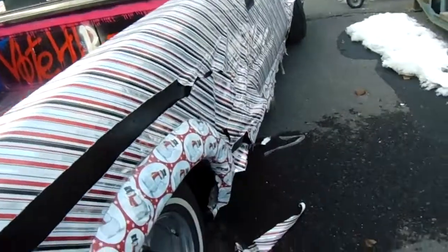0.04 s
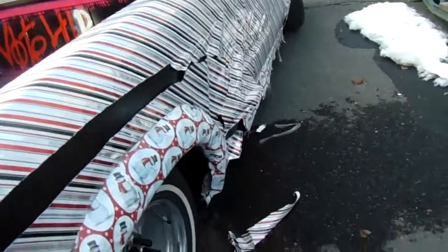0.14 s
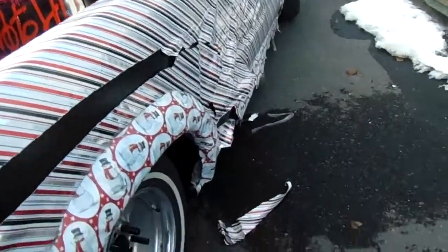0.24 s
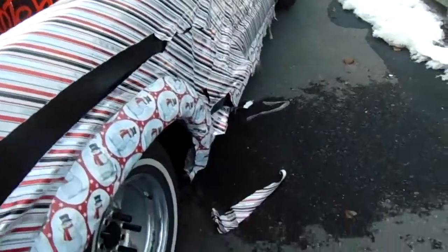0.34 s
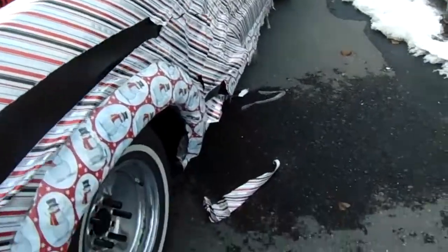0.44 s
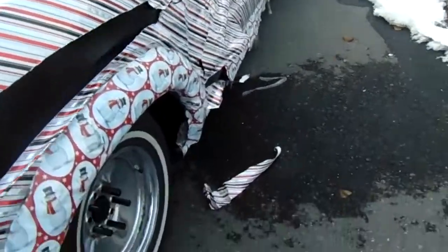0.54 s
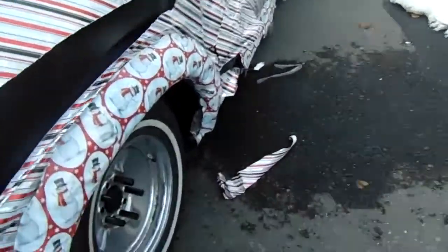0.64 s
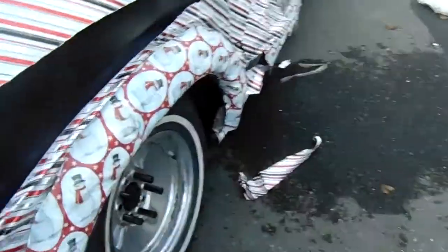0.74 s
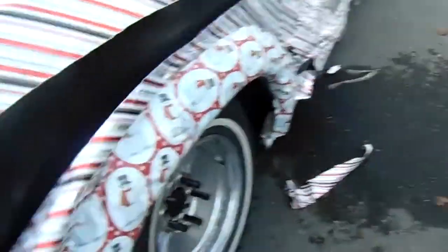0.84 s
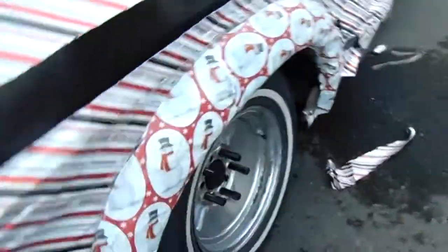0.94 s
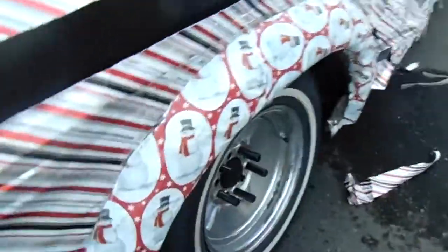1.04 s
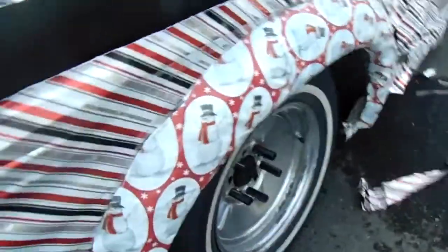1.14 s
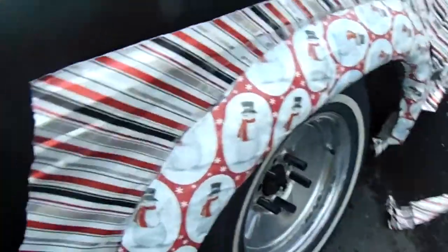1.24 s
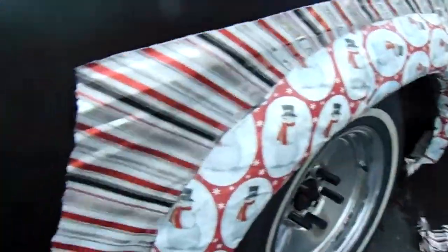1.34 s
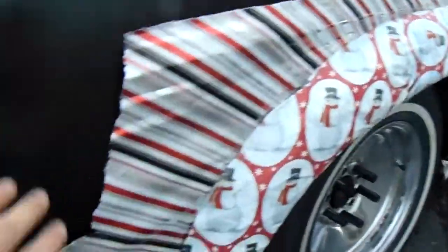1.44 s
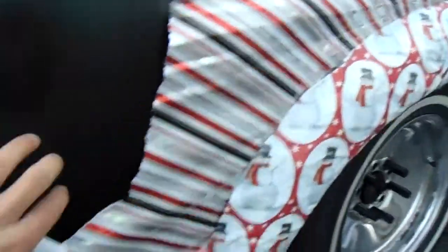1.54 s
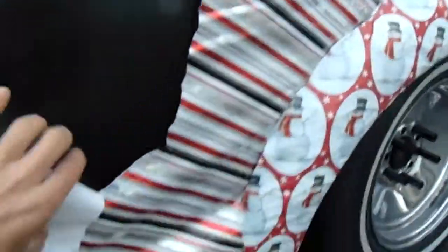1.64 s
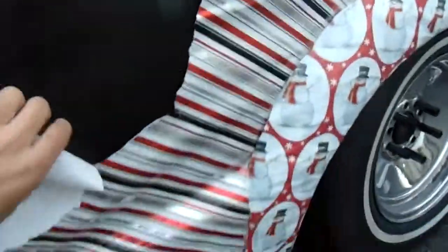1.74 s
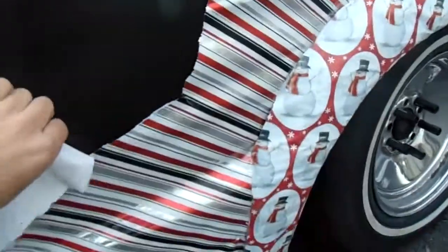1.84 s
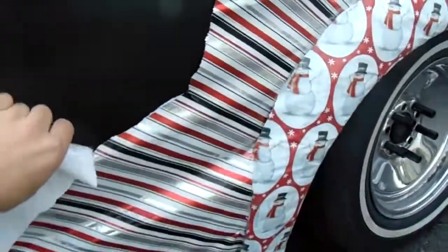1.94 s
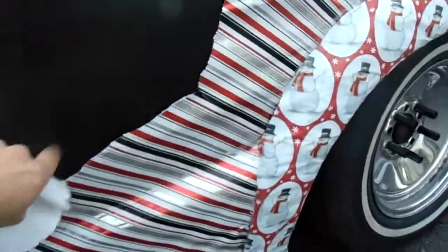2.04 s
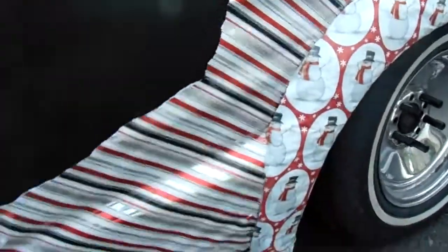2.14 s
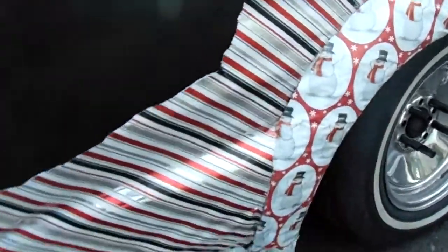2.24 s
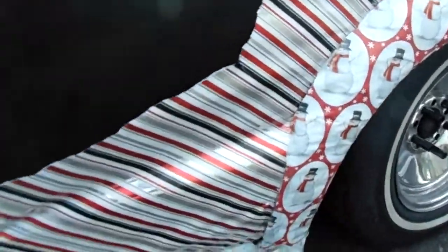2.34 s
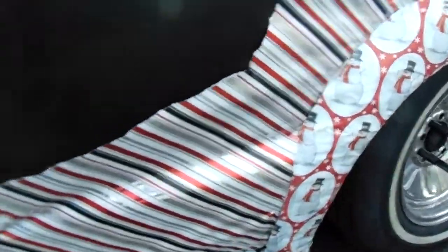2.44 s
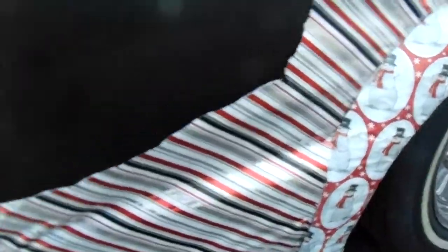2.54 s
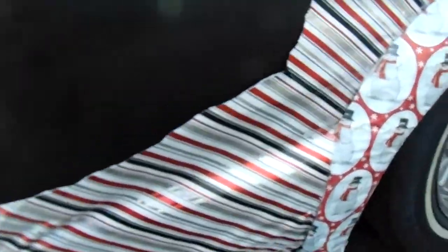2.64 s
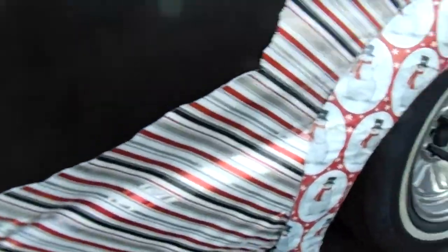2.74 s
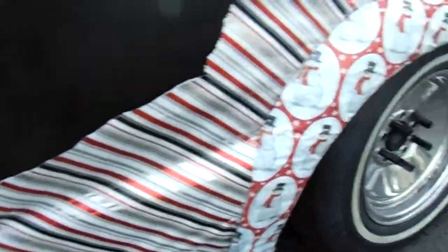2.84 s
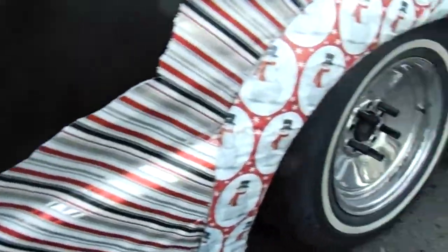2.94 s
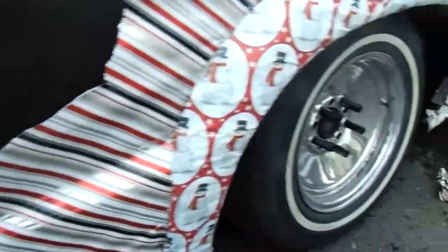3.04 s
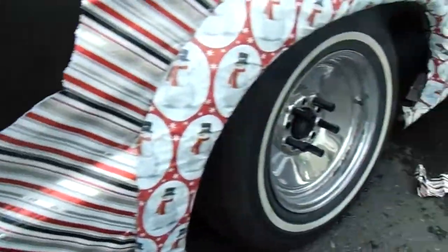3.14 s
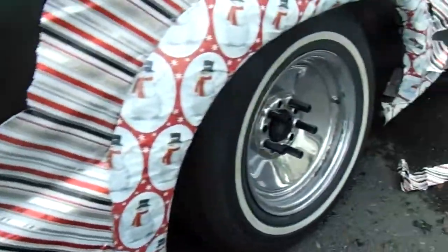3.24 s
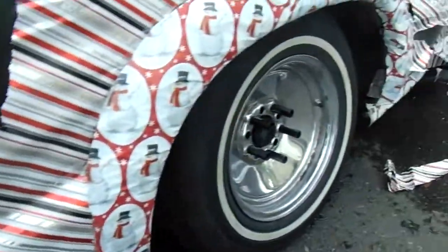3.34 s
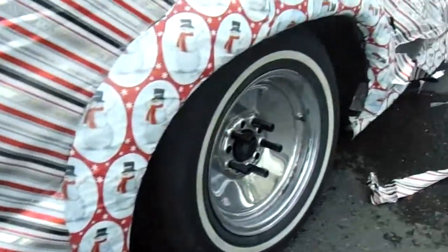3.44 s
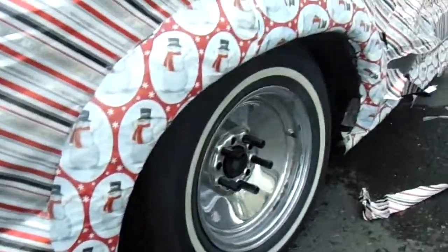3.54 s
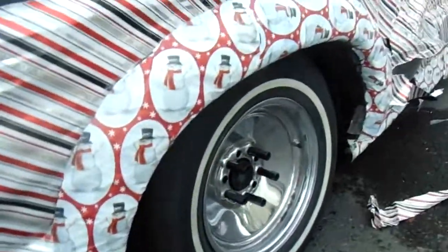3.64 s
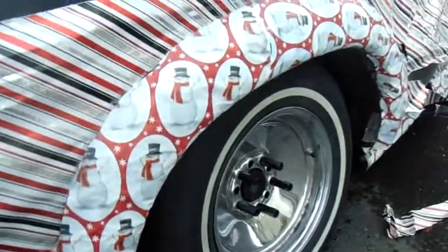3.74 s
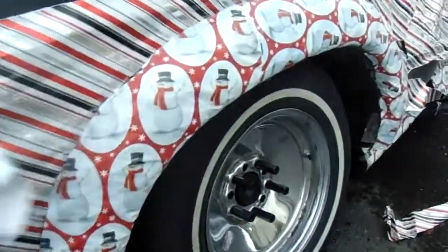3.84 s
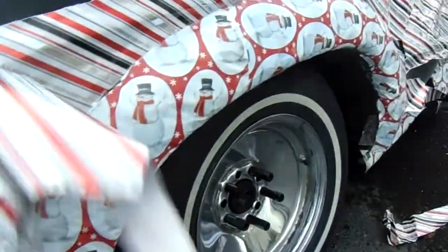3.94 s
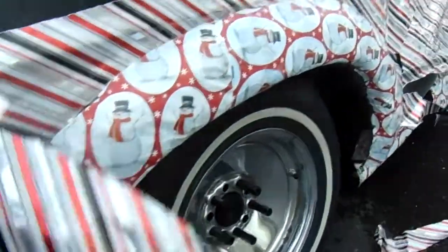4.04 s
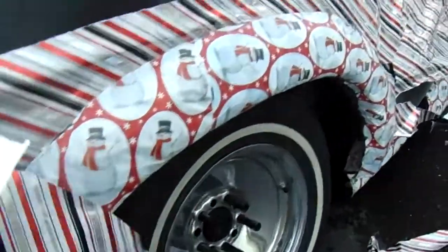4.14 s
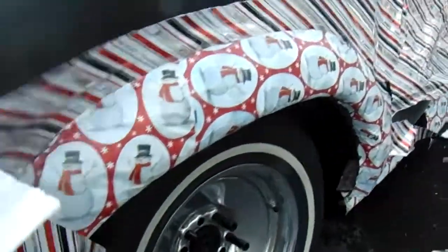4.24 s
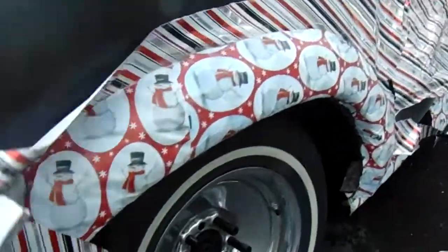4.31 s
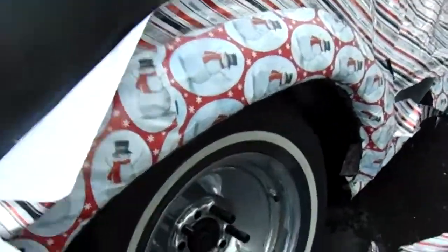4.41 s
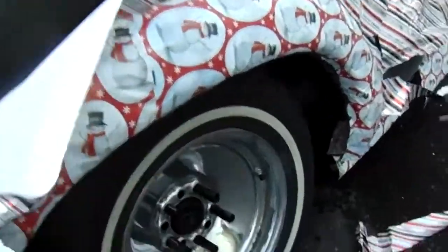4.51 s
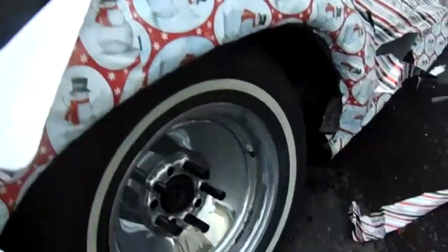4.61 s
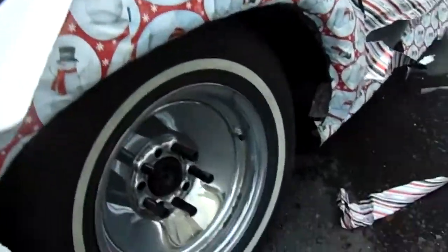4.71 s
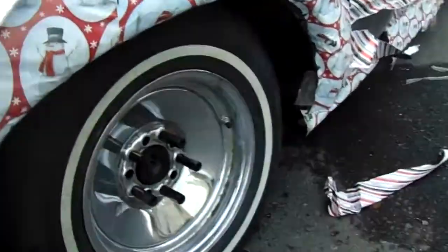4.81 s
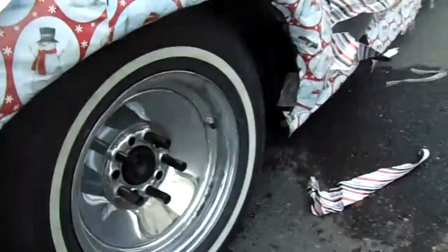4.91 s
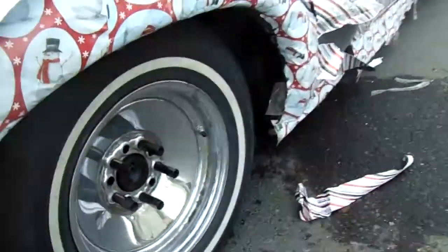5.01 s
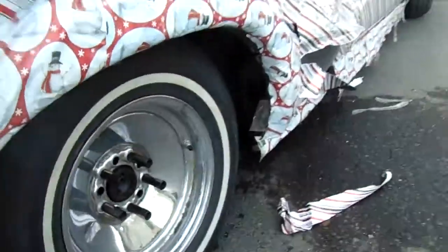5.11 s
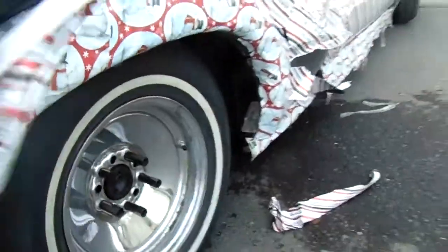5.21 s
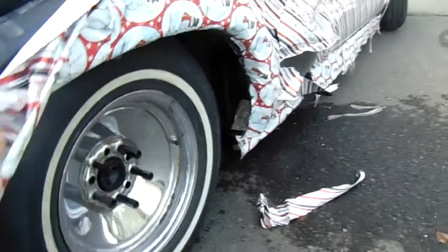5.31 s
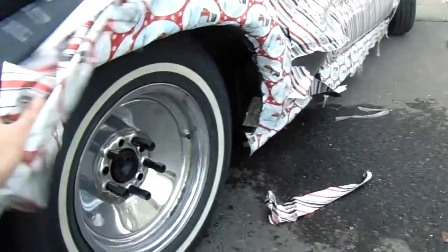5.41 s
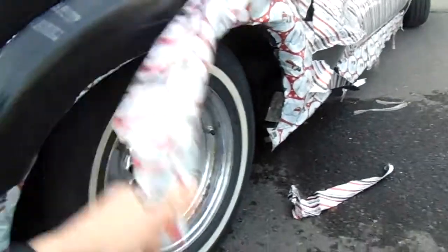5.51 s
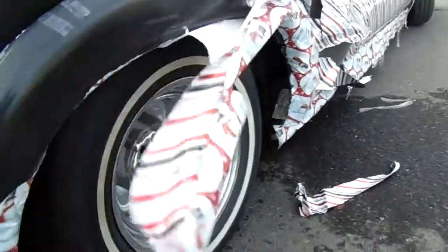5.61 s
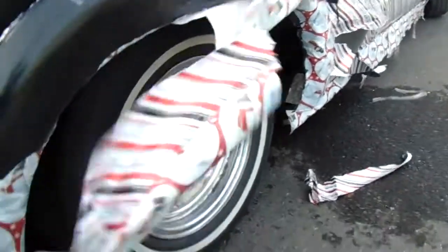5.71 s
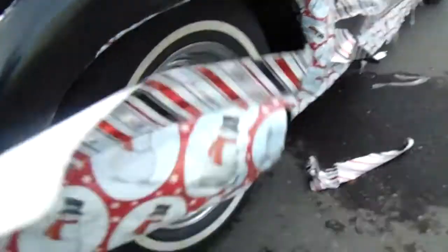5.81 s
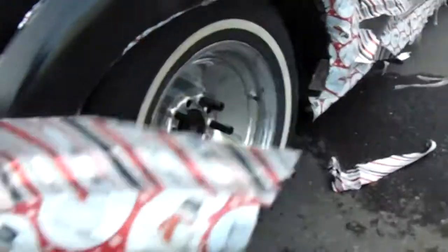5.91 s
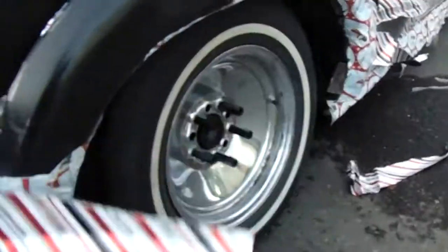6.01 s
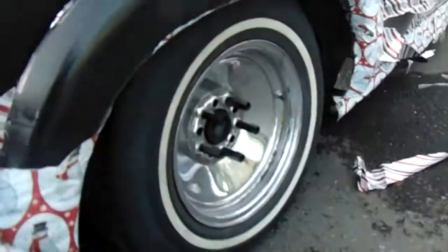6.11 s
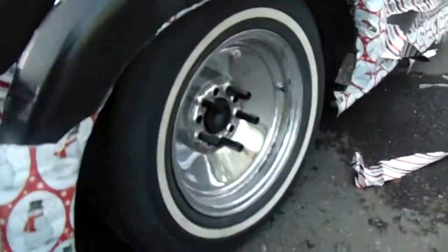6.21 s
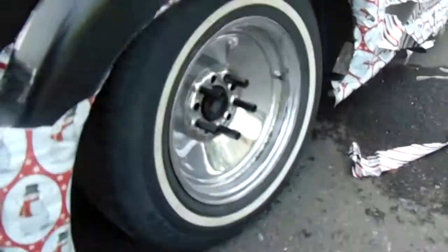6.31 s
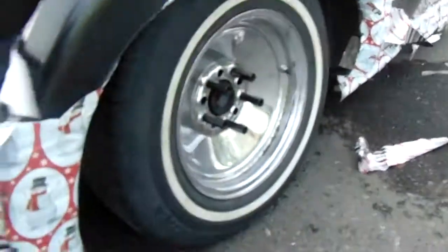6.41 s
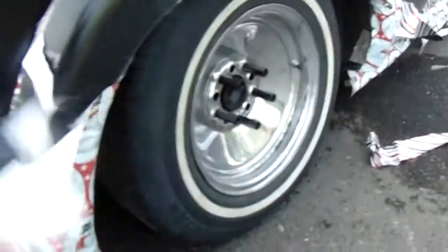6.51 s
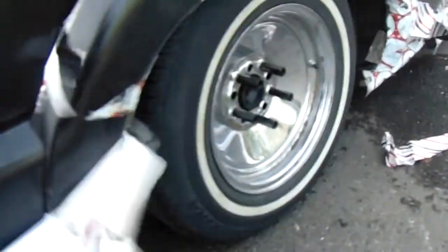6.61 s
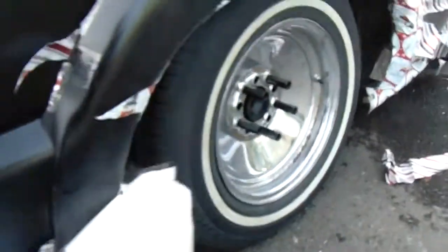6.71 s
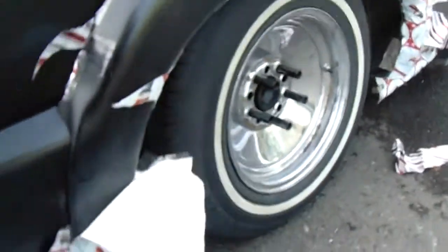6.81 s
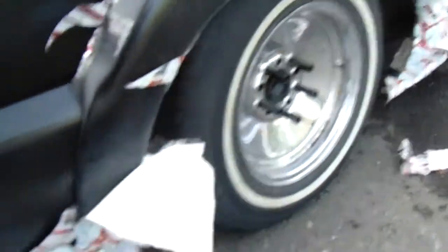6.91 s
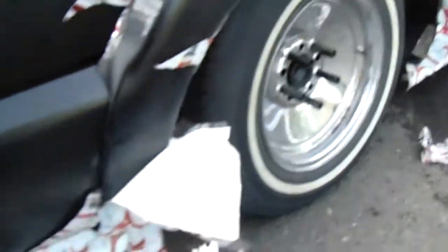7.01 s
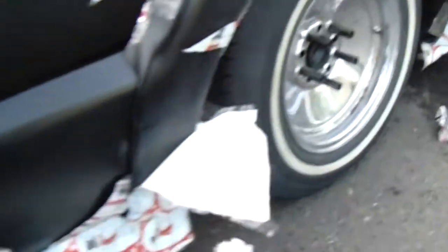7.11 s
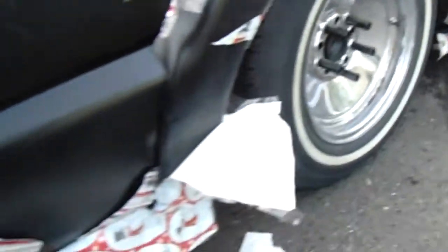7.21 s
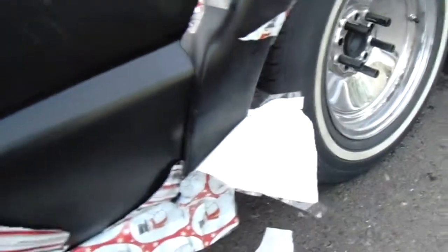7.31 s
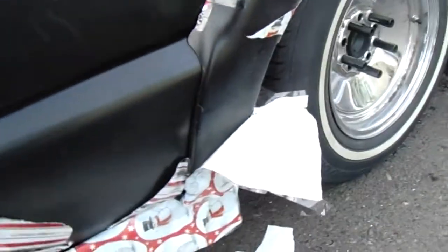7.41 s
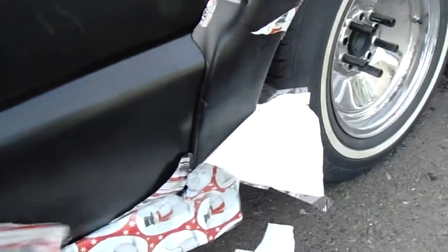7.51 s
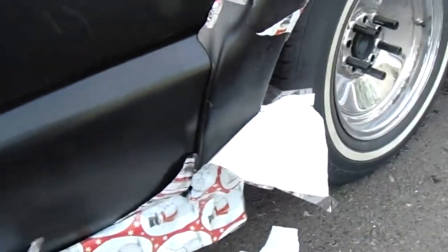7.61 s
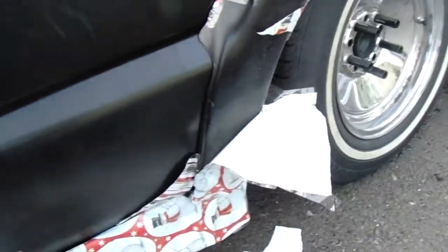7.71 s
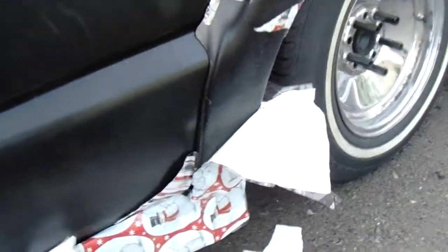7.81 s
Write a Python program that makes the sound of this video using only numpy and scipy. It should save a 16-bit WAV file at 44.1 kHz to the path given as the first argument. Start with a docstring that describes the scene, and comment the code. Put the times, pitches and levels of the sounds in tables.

```python
"""Wrapping paper is torn and crumpled off a car body outdoors, in rushes with short pauses.
Breaking fibres crackle as clumped noise bursts, creases snap as clicks, the loose sheet drags as resonant noise.
Knocks and the tearing paper ring the low modes of the wing panel.
The street and the handled car body rumble as low noise bands, a far engine drones as a wavering sine;
the microphone hisses and whines."""
import sys
import numpy as np
from scipy import signal
from scipy.io import wavfile
from scipy.ndimage import uniform_filter1d

SR = 44100
rng = np.random.default_rng(int(sys.argv[2]) if len(sys.argv) > 2 else 0)


def transcribe(u):
    """Save the signal u as a 16-bit wav file named by the first command-line argument.

    u: samples, shape (n,) or (channels, n), limited to [-1, 1]; the rate is SR.
    q: integer samples, one column per channel.
    """
    v = np.clip(np.atleast_2d(u).T, -1, 1)
    q = np.round(v * 32767).astype(np.int16)
    wavfile.write(sys.argv[1], SR, q)


N = 346211


def from_db(db):
    """Decibels to gain."""
    return 10 ** (np.asarray(db) / 20)


def rms_one(x):
    """Scale to rms 1."""
    return x / np.sqrt(np.mean(x ** 2) + 1e-20)


def in_time(rows):
    """Columns of a curve table at every sample."""
    s, *columns = np.transpose(rows)
    return [np.interp(np.arange(N) / SR, np.sort(s), c) for c in columns]


def at_hz(points, hz):
    """A spectrum read on a log-frequency axis."""
    curve_hz, curve_db = np.array(points).T
    return np.interp(np.log(hz), np.log(curve_hz), curve_db)


def drift(rate_hz):
    """Slow chance: noise twice through a one-pole low-pass, spread 1."""
    step = 20      # drawn once per 20 samples
    r = np.exp(-2 * np.pi * rate_hz * step / SR)
    noise = rng.standard_normal(N // step + 2002)
    slow = signal.lfilter([1], [1, -2 * r, r * r], noise)[2000:]      # skip the settling
    return np.interp(np.arange(N) / step, np.arange(len(slow)), rms_one(slow))


def band(x, low_hz, high_hz):
    """Band-pass."""
    sos = signal.butter(2, [low_hz, min(high_hz, SR * .45)], "band", fs=SR, output="sos")
    return signal.sosfilt(sos, x)


def dying(clicks, t60):
    """Each click starts an exponential fall of 60 dB in t60 seconds."""
    return signal.lfilter([1], [1, -from_db(-60 / (t60 * SR))], clicks + 1e-18)


def hands():
    """Level and colour of the crackle: tugs over the rustle, the loudest setting the colour."""
    # tugs on the sheet: (start [s], length [s], start level [dB], end level [dB],
    # treble lift [dB], low-mid lift [dB])
    tugs = [(.2,0.033,-40.5,-47.5,-6,11),(0.36,0.14,-48.5,-25,3.5,-8),(0.601,0.016,-29.5,-23,2,0.5),(0.687,.10,-44.5,-29.5,7,1.5),(0.849,0.048,-38.5,-33.5,1.5,-4),
            (0.9,0.12,-13,-39.5,-1.5,-3.5),(1.008,0.12,-32,-39,18,0),(1.232,0.033,-37.5,-36.5,-1,1.5),(1.262,0.12,-29,-39,-3,0.5),
            (1.631,0.098,-28.5,-49,-11.5,-0.5),(1.86,.2,-28,-28.5,0,-4.5),(2.072,0.11,-23.5,-22.5,1,-9.5),(2.2,0.18,-21.5,-26.5,6.5,-2.5),
            (2.487,0.037,-16,-32,9.5,-3.5),(2.539,0.13,-22.5,-31,4.5,-6.5),
            (3.306,.07,-39,-37,1,-2),(3.48,0.064,-33,-30,9,-3),(3.667,0.27,-44,-37,-8,-6.5),(4.073,0.25,-36.5,-53.5,-3.5,5),
            (4.356,0.042,-30,-34.5,1.5,1),(4.616,0.072,-32.5,-46.5,10,0),
            (4.722,0.057,-49,-37.5,1,1),(4.831,0.17,-33.5,-36.5,-5,-5.5),(5.05,0.088,-26,-22.5,-2.5,-4),
            (5.158,0.067,-21,-15.5,-1.5,-4.5),(5.243,0.13,-28.5,-23.5,2,-3.5),
            (5.535,0.19,-19.5,-31.5,5,-3.5),(5.796,0.051,-31,-36.5,10,3),
            (6.346,0.075,-27,-30,3,-0.5),(6.436,0.044,-22,-21,4.5,-7.5),(6.474,0.16,-28.5,-33,6.5,0.5),(6.608,0.048,-20.5,-23.5,8,-3),(6.643,0.0091,-14.5,-16.5,-2.5,-1),
            (6.667,0.13,-34.5,-25,2.5,0),(6.805,0.16,-31,-51,0.5,0),
            (7.549,0.038,-29,-48,5.5,-3),(7.604,0.13,-37.5,-26,2.5,-1.5),(7.756,0.081,-28,-20.5,1,3)]
    # the loose sheet rustles between tugs: (time [s], level [dB])
    rustle = [(0,-56),(.13,-62.5),(.15,-48.5),(.55,-40.5),(.83,-34),(1.17,-48),(1.59,-48.5),(1.8,-42),(2.43,-38.5),(2.72,-51.5),
              (3.08,-61),(3.12,-46.5),(4.45,-44),(4.85,-40),(5.44,-46.5),(5.88,-46.5),(6.2,-51.5),(6.3,-42.5),
              (7.0,-55.5),(7.12,-61.5),(7.2,-69),(7.45,-59),(7.6,-43)]
    rustle_crisp_db, rustle_flap_db = -1.5, 4.5      # its treble and low-mid lift
    rise_db_per_s, fall_db_per_s = 1300, 1201      # how fast a tug takes hold and lets go

    t = np.arange(N) / SR
    power = from_db(2 * in_time(rustle)[0])
    crisp, flap = rustle_crisp_db * power, rustle_flap_db * power
    for s, length, start_db, end_db, crisp_db, flap_db in tugs:
        near = slice(round((s - .1) * SR), round((s + length + .2) * SR))
        since_start = t[near] - s
        db = np.interp(since_start, [0, max(length, 1e-3)], [start_db, end_db])
        db += rise_db_per_s * np.minimum(since_start, 0)
        db -= fall_db_per_s * np.maximum(since_start - length, 0)
        tug = from_db(2 * db)
        power[near] += tug
        crisp[near] += crisp_db * tug
        flap[near] += flap_db * tug
    return np.sqrt(power), crisp / power, flap / power


def crackle(per_s, spread_db, clump_db, share_db, smooth_db, tick_db):
    """Fibres break at random, in clumps; each break shakes the whole sheet, unevenly from band to band."""
    # tone of the paper: (frequency [Hz], level [dB per Hz])
    paper_tone = [(150, -4.5), (280, -2), (600, -3.5), (1100, -3.5), (2200, -3), (4500, -5.5), (8000, -8.5),
                  (14000, -11)]
    gain, crisp_db, flap_db = hands()
    chance = per_s * from_db(clump_db * drift(40)) / SR
    born = np.flatnonzero(rng.random(N) < chance)
    power = from_db(2 * spread_db * np.minimum(rng.exponential(1, len(born)), 3))
    white = rng.standard_normal((2, N))
    edges = 200 * 2 ** np.arange(0, 6.6, .5)      # half-octave bands
    out = 0
    for k, (low, high) in enumerate(zip(edges, edges[1:])):
        hz = np.sqrt(low * high)
        breaks = np.zeros(N)
        breaks[born] = power * from_db(2 * share_db * rng.standard_normal(len(born)))

        ring_s = 0.0067 + 12 / hz      # large folds ring on longer than small ones
        shake = dying(dying(breaks, ring_s), ring_s / 3)
        shake *= from_db(2.6 * drift(55))      # the edge flutters as it parts
        # a smooth floor fills in between the breaks; the root turns power into gain
        shake = np.sqrt(shake / shake.mean() + from_db(2 * smooth_db))

        # the break itself is a bare click of random sign, stronger in the treble
        tick_gain = from_db(tick_db + 2.5 * np.log2(hz / 4000))
        ticks = tick_gain * rms_one(np.sqrt(breaks)) * np.sign(white[0])

        octaves = np.log2(hz / 2700)
        colour_db = crisp_db * np.clip(octaves - .5, 0, 2) / 2
        colour_db += flap_db * np.clip(-octaves - .5, 0, 2) / 2
        colour_db += 2.0 * drift(12.2)      # the free edge changes shape as it runs
        sound = band(shake * white[k % 2] + ticks, low, high)
        out = out + from_db(at_hz(paper_tone, hz) + colour_db) * sound
    return gain * rms_one(out)


def yard(x):
    """A few dull echoes from the ground and nearby walls."""
    out = np.zeros(N)
    for lag_s, db in [(.011, -24), (.041, -23.5)]:
        lag = round(lag_s * SR)
        out[lag:] += from_db(db) * x[:-lag]
    return band(out, 180, 6100)


def rumble():
    """Low rumble of the street and of the handled car body: noise bands that swell with the pull on the paper."""
    # rumble before the handling swell: (time [s], level [dB])
    rumble_level = [(0, -39.5), (.9, -48.5), (1.5, -44), (2.0, -46.5), (3.0, -47.5), (4.2, -49),
                    (5.9, -50.5), (6.3, -48), (7.05, -53), (7.85, -47.5)]
    # tone of the rumble: (frequency [Hz], level [dB per Hz])
    rumble_tone = [(13, -39), (22, -5.5), (59, -1.5), (81, -7.5), (93, -2), (200, -10), (400, -23),
                   (900, -22), (1600, -48)]
    follows, lag_s = 0.32, 0.041      # share of the handling's level swing, smoothing [s]

    white = rng.standard_normal((2, N + SR))
    edges = 20 * 2 ** np.arange(0, 6.1, .5)
    out = 0
    for k, (low, high) in enumerate(zip(edges, edges[1:])):
        db = at_hz(rumble_tone, np.sqrt(low * high)) + 3.2 * drift(1.6)
        out = out + from_db(db) * band(white[k % 2], low, high)[SR:]      # drop the filter's run-in
    handling = uniform_filter1d(hands()[0], round(lag_s * SR))
    swell = (handling / np.median(handling)) ** follows
    return from_db(in_time(rumble_level)[0]) * swell * rms_one(out)


def drone():
    """A far engine: a low sine that wavers in pitch and strength."""
    # its course before the wavering: (time [s], pitch [Hz], level [dB])
    engine = [(0, 87.6, -45.5), (.7, 84, -50.5), (.87, 83.4, -30), (1.0, 88.5, -70.5), (1.4, 101.3, -42.5),
              (1.6, 99, -52), (2.3, 96.6, -50), (2.6, 100.7, -87), (4.1, 119, -44.5), (4.5, 120, -70.5)]
    hz, db = in_time(engine)
    cycles = np.cumsum(hz * (1 + .02 * drift(5.3))) / SR
    return from_db(db + 1.4 * drift(5.3)) * np.sin(2 * np.pi * cycles)


def hiss():
    """Microphone noise with a faint electronic whine, a thin comb of lines that sink slowly in pitch."""
    # whine lines before the fade: (frequency at the start [Hz], rms level [dB])
    whine = [(6067, -68), (8710, -68.5), (9189, -68.5), (9668, -71), (11531, -69.5), (12489, -74)]
    # fade of whine and hiss, strongest early on: (time [s], level [dB])
    whine_fade = [(0, 5), (.6, 10.5), (1.5, -3), (3, -9.5), (7.2, -14.5)]
    sag_per_s = .00016      # share of its pitch the whine loses each second
    hiss_db, hiss_follows = -60.5, 0.84      # level before the fade, share of the fade it takes

    hz, db = np.transpose(whine)[:, :, None]
    t = np.arange(N) / SR
    fade_db = in_time(whine_fade)[0]
    cycles = hz * t * (1 - sag_per_s * t / 2) + rng.random(hz.shape)
    lines = from_db(db) * np.sqrt(2) * np.sin(2 * np.pi * cycles)
    noise = rms_one(band(rng.standard_normal(N), 900, 19000))
    return from_db(hiss_db + hiss_follows * fade_db) * noise + from_db(fade_db) * lines.sum(axis=0)


def panel(paper):
    """Low modes of sheet metal boom when knocked, shorter under a hand; the tearing sheet shakes them too."""
    # knocks: (time [s], level [dB], freedom to ring [0-1], hardness [dB per octave])
    knocks = [(0.14, -31, 0.27, 9), (0.198, -31, .3, 9), (1.623, -19.5, 0.98, -0.5),
              (1.666, -28.5, 0.98, 3), (5.324, -33, 0.53, 23), (5.534, -29, 0.14, 29),
              (6.061, -40, 0.85, 10), (7.305, -45.5, 0.2, 18), (7.791, -24, 0.13, 7)]
    # modes of the panel: (frequency [Hz], level [dB], free ring t60 [s])
    modes = [(61, -0.5, 0.54), (104, 2, 0.18), (163.4, 5, .7), (179.6, -1.5, .6), (233.7, 2.5, 0.2),
             (316, -3.5, 0.13), (420, -14, 0.031)]
    attack_s, shake_db = .004, -12      # a palm lands softly; how strongly the paper shakes the panel

    out = np.zeros(N + SR)
    t = np.arange(SR) / SR
    attack = np.minimum(t / attack_s, 1)
    strengths_db = rng.normal(0, 0.9, (len(knocks), len(modes)))
    for (s, db, free, hard_db), own_db in zip(knocks, strengths_db):
        for (hz, level_db, t60), extra_db in zip(modes, own_db):
            fall_db = -60 * t / (t60 * np.clip(free, .05, 1))
            tilt_db = hard_db * np.log2(hz / 164)      # a hard knock favours the upper modes
            boom = from_db(db + level_db - 7.5 + extra_db + fall_db + tilt_db)
            out[round(s * SR):][:SR] += boom * np.sin(2 * np.pi * hz * t) * attack
    out[:N] *= from_db(1.2 * drift(9))      # the loose panel booms unevenly

    for hz, level_db, t60 in modes:
        r = from_db(-60 / (t60 * SR))
        resonator = [1, -2 * r * np.cos(2 * np.pi * hz / SR), r * r]
        shaken = signal.lfilter([1 - r * r, 0, r * r - 1], resonator, paper)
        out[:N] += from_db(level_db + shake_db) * shaken
    return out[:N]


def snaps():
    """A crease buckles: one sharp click and a short rattle, broad but leaning to the pitch of the fold."""
    # creases: (time [s], level [dB])
    creases = [(0.409, -23.5), (0.4969, -14), (0.6033, -12.5), (0.6767, -15.5), (0.764, -22.5),
               (0.8426, -19.5), (0.8648, -16.5), (0.893, 8), (0.9004, 10.5), (1.0038, -19), (1.263, -19),
               (1.3269, -18), (1.3527, -23), (1.427, -30), (1.608, -17.5), (1.8603, -20.5), (1.8932, -16),
               (2.0255, -28), (2.0716, -15.5), (2.0923, -22), (2.1081, -10.5), (2.146, -18), (2.247, -10),
               (2.298, -10), (2.3685, -16), (2.374, -17), (2.4032, -20.5), (2.4337, -21), (2.4478, -17.5),
               (2.4716, -8.5), (2.486, -22), (2.5536, -37), (2.6062, -16), (2.65, -22), (2.655, -18.5),
               (2.861, -39), (3.0122, -42), (3.1085, -37), (3.268, -22.5), (3.3013, -23.5), (3.3558, -22.5),
               (3.4006, -21.5), (3.4348, -25), (3.492, -21), (3.497, -16), (3.5905, -31), (3.6296, -27),
               (3.69, -24.5), (3.73, -22.5), (3.7583, -25), (3.895, -31), (4.0575, -22), (4.358, -22.5),
               (4.3823, -8), (4.568, -24), (4.6176, -22.5), (4.842, -16.5), (4.8617, -18), (4.8927, -18.5),
               (4.922, -21.5), (4.9554, -13.5), (4.9843, -15.5), (5.001, -16), (5.0385, -11), (5.09, -15),
               (5.12, -11), (5.148, -17), (5.1843, -14), (5.2057, -4.5), (5.3167, -15), (5.3413, -14),
               (5.414, -29.5), (5.476, -21), (5.5156, -30), (5.533, -16), (5.557, -22), (5.572, -9),
               (5.5786, -19), (5.6164, -19), (5.79, -18), (6.0182, -28.5), (6.144, -30), (6.246, -37),
               (6.277, -35), (6.345, -23), (6.518, -15.5), (6.537, -24), (6.6025, -13), (6.646, -4.5),
               (6.6475, -8), (6.7204, -31), (7.5004, -25.5), (7.5363, -20), (7.5562, -23), (7.653, -11),
               (7.7032, -20), (7.761, -28)]
    size = 2048
    out = np.zeros(N + size)
    t = np.arange(size) / SR
    draws = rng.standard_normal((len(creases), size + 1))
    for (s, db), (fold, *noise) in zip(creases, draws):
        hz = 3500 * 2 ** np.clip(.5 * fold, -1, 1.3)      # small folds snap higher
        burst = noise * (from_db(-60 * t / .006) + .16 * from_db(-60 * t / .035))
        burst[0] = 2.5      # the click
        burst = band(burst, hz / 1.8, hz * 1.8) + .9 * band(burst, 800, 18000)
        at = round(s * SR)
        out[at:at + size] += from_db(db) * burst / np.sqrt(np.sum(burst ** 2) / 30)      # equal energy
    return out[:N]


def drag():
    """The loose sheet drags hollow over the wing: friction noise through the resonances of its curl."""
    # strokes: (time [s], level [dB])
    strokes = [(4.04, -100), (4.06, -46), (4.18, -39.5), (4.24, -48), (4.38, -35.5), (4.45, -45),
               (4.58, -45), (4.8, -100)]
    # resonances of the curl: (frequency [Hz], width [Hz], level [dB])
    resonances = [(360, 340, -6.5), (810, 160, -2), (1070, 160, -2), (1850, 850, -2.5)]
    rub = rng.standard_normal(N) * from_db(1 * drift(30))
    out = 0
    for hz, width, db in resonances:
        hollow = rms_one(band(rub, hz - width / 2, hz + width / 2))
        out = out + from_db(db + 3 * drift(3.4)) * hollow
    return from_db(in_time(strokes)[0]) * out


def scene():
    """Paper, panel, rumble, drone and hiss, on one channel."""
    paper = crackle(per_s=350, spread_db=3.0, clump_db=4.0, share_db=3.5, smooth_db=-4.0, tick_db=-4.0)
    paper = paper + snaps() + drag()
    mix = paper + yard(paper) + panel(paper) + rumble() + drone() + hiss()
    return mix[None]


def record(dry):
    """The loudest snaps are flattened at full scale, then a steep low-pass cuts the top."""
    cutoff_hz = 14200
    low_pass = signal.ellip(12, .3, 90, cutoff_hz, fs=SR, output="sos")
    return signal.sosfilt(low_pass, np.clip(dry, -1, 1))


dry = scene()
out = record(dry)
transcribe(out)
```